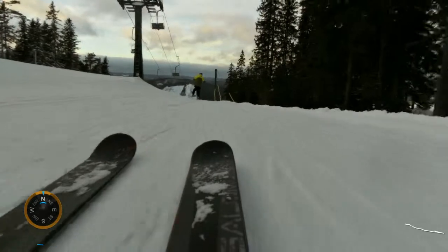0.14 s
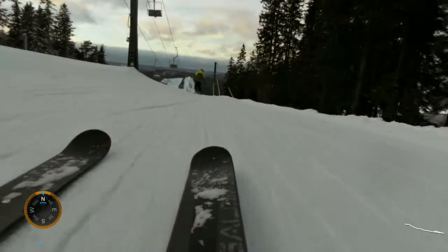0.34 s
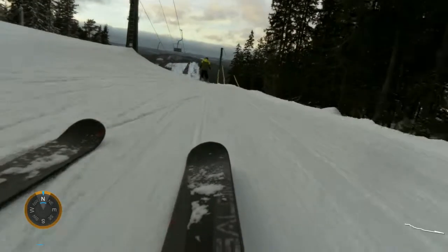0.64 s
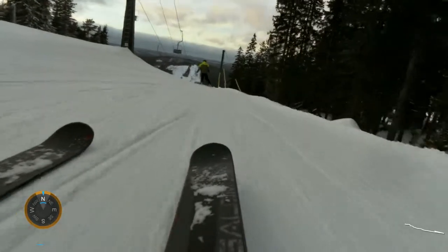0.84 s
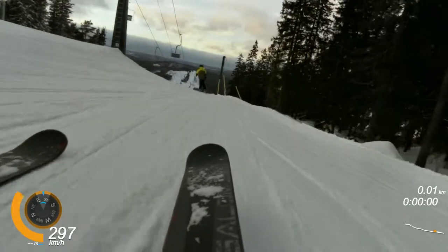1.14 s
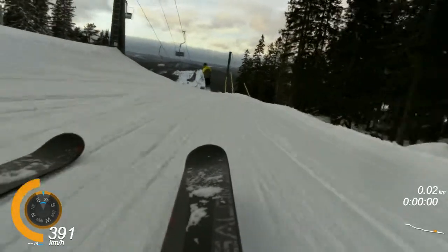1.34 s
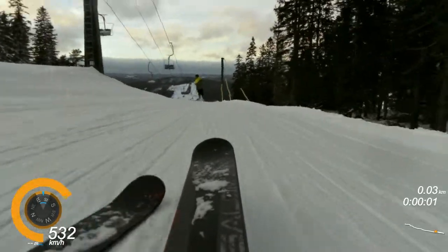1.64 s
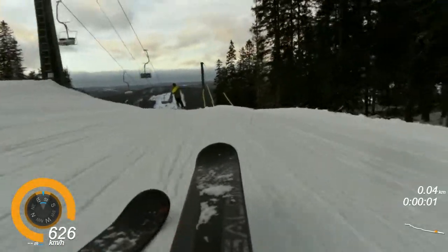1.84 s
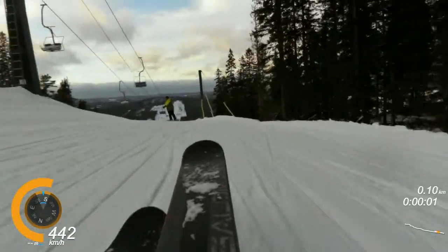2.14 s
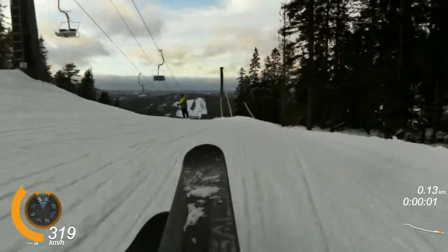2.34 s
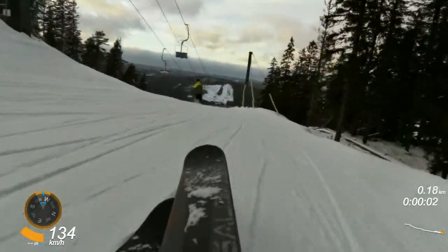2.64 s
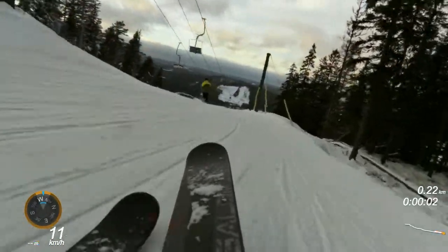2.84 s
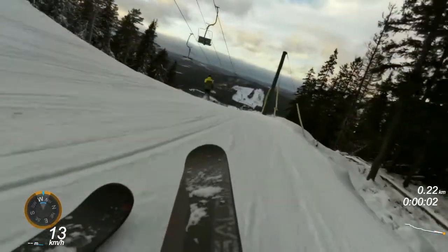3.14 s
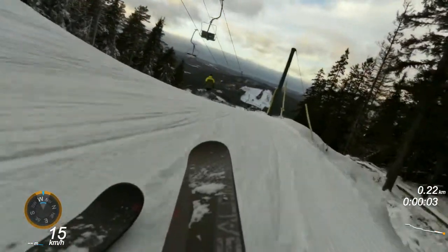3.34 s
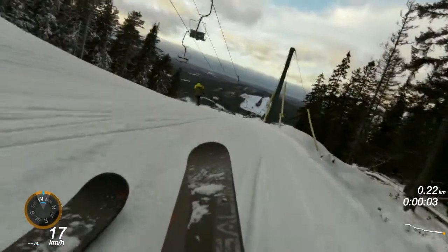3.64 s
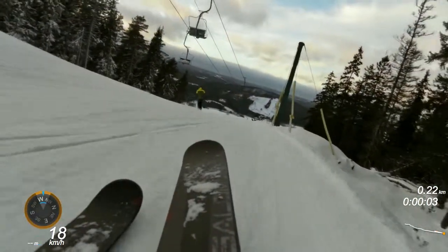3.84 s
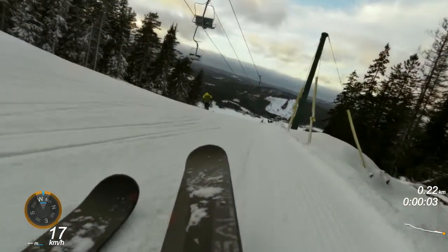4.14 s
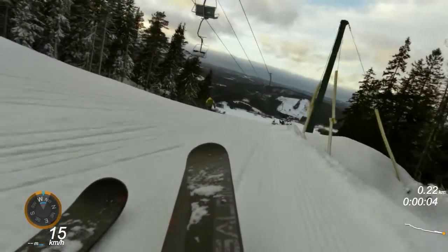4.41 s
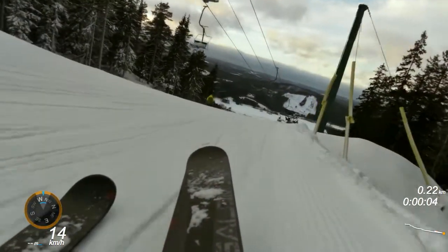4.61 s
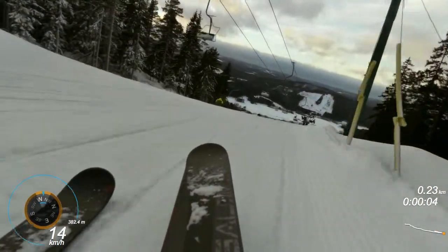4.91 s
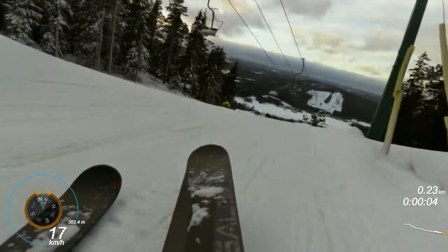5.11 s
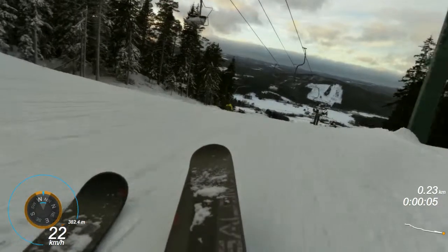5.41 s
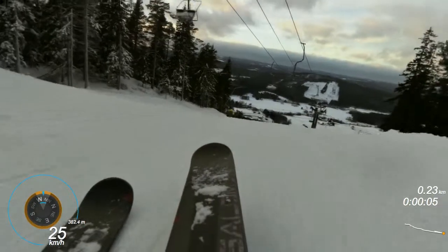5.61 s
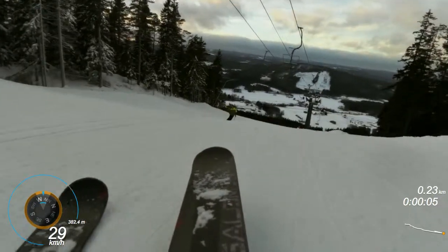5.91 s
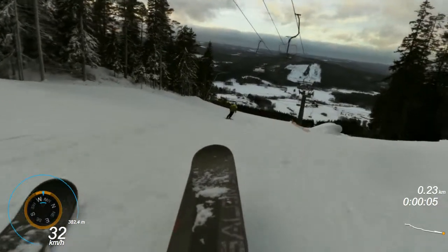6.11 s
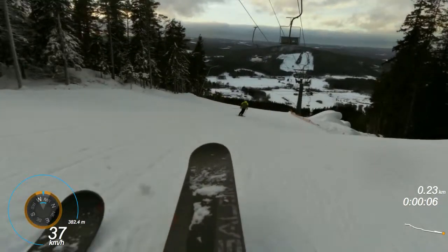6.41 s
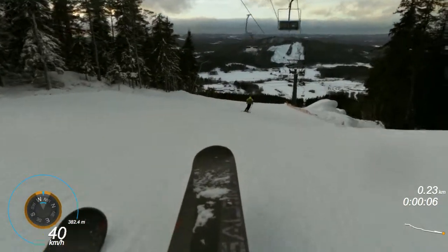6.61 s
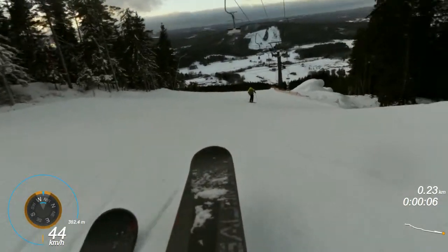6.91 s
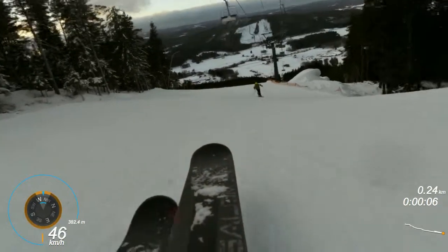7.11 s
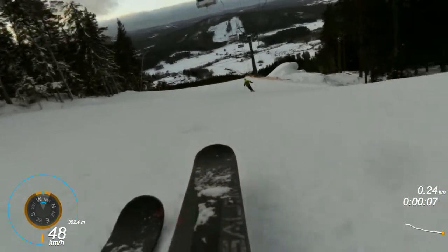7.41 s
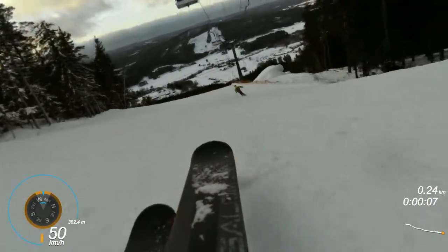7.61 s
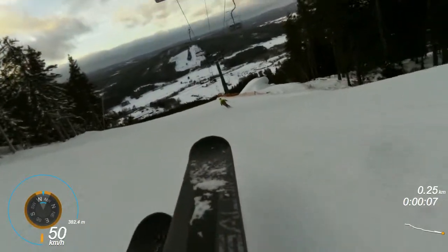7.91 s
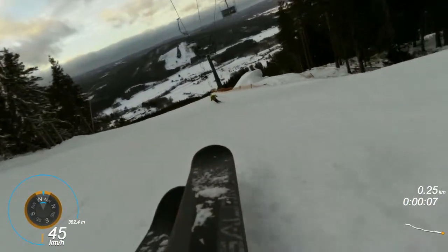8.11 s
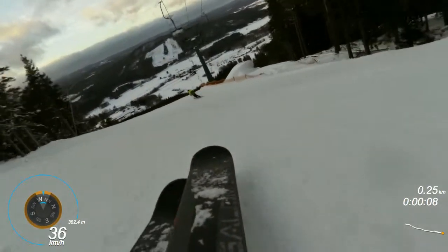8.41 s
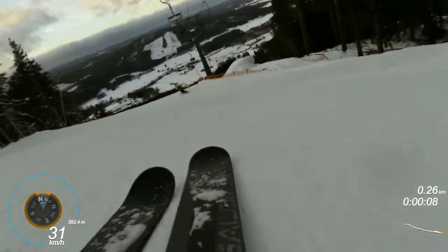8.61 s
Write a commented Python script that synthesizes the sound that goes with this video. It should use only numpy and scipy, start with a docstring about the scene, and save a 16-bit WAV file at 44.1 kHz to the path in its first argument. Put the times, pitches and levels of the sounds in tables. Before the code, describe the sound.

A ski runs over groomed snow, heard from a sealed camera mounted on it. It starts with rough jolts, rattling metal clacks and a deep hum, then settles into quieter chatter and muffled hiss. The mount knocks dully at uneven intervals and creaks faintly, and the binding clacks sharply now and then. Near the end come two loud, distorting bursts of thuds and clacks.

```python
"""A ski knocks, clacks and jolts over groomed snow, heard from a camera riding on it in a sealed housing.
Almost all the sound comes through the ski: the camera mount knocks and creaks, loose metal in the
binding clacks, and ruts give rough jolts. Underneath, the ski hums as it bends and chatters over small
bumps, while the hiss of the snow comes muffled through the housing. The loudest moments clip.
A "mode" below is one of the pitches at which a part naturally rings."""
import sys
import numpy as np
from scipy import signal
from scipy.fft import rfft, irfft, next_fast_len
from scipy.io import wavfile
from scipy.ndimage import map_coordinates

SR = 44100
rng = np.random.default_rng(int(sys.argv[2]) if len(sys.argv) > 2 else 0)


def generate_wav(sig):
    """Save sig (samples, or channels by samples) to the path in sys.argv[1] as 16-bit PCM at SR."""
    pcm = np.round(np.clip(np.atleast_2d(sig).T, -1, 1) * 32767).astype(np.int16)
    wavfile.write(sys.argv[1], SR, pcm)


N = 385875
TIME_S = np.arange(N) / SR


def amp(db):
    """Turn decibels into a gain."""
    return 10 ** (np.asarray(db) / 20)


def unit(x):
    """Scale x to an average (rms) level of 1."""
    return x / np.sqrt(np.mean(x ** 2) + 1e-20)


def along(points, hz):
    """Read between (pitch_hz, value) points on a log pitch scale."""
    pitches, values = np.transpose(points)
    return np.interp(np.log(hz + 1), np.log(pitches + 1), values)


def wobble(rate):
    """A smooth curve through rate random values a second."""
    return map_coordinates(rng.standard_normal(int(N * rate / SR) + 4), [np.arange(N) * rate / SR])


def filtered(x, response):
    """Filter x by response, a function of frequency."""
    size = next_fast_len(N + SR // 2)
    return irfft(rfft(x, size) * response(np.fft.rfftfreq(size, 1 / SR)), size)[:N]


def rush(spectrum, lumps_db, rate):
    """Uneven noise at level 1, shaped by (pitch_hz, relative_db) points, with rate lumps a second."""
    drive = rng.standard_normal(N) * amp(lumps_db * wobble(rate))
    return unit(filtered(drive, lambda hz: amp(along(spectrum, hz))))


def snow_hiss(level_db):
    """Snow hisses under the ski, muffled by the housing, with a faint steady hiss above it."""
    # the hiss inside the housing: pitch_hz, relative_db
    hiss_spectrum = [(820, -28), (1400, -6.5), (1600, -8), (1740, -4.5), (1940, -8), (2130, -5.5),
                     (2320, -6.5), (2630, -2), (2990, -8), (3230, -3), (3510, 1), (4060, -1.5), (4560, -8),
                     (5110, -5), (6430, -16.5), (8360, -33.5), (14100, -120)]
    # how the hiss's treble rises and falls: time_s, gain_db
    brightness = [(0, -5.5), (1.7, -4), (1.95, 0.5), (2.5, -0.5), (3.1, -1), (5.3, -1.5), (6.0, -2.5),
                  (7.6, 0.5), (8.75, -4)]
    # the faint high hiss: pitch_hz, relative_db
    high_spectrum = [(5000, -120), (7000, -2.5), (9000, -2), (12000, -12), (15000, -34.5)]
    hiss = rush(hiss_spectrum, lumps_db=1.5, rate=270)
    treble = filtered(hiss, lambda hz: hz > 4700)
    treble_gain = amp(np.interp(TIME_S, *np.transpose(brightness)))
    hiss = (hiss + (treble_gain - 1) * treble) * amp(level_db + 1.3 * wobble(22))
    return hiss + amp(-90.5) * rush(high_spectrum, lumps_db=0.5, rate=120)


def grit():
    """Icy grains scrape under the edge: brief puffs at the pitch where the housing rings most."""
    # scraping grains: time_s, level_db
    grains = [(3.391, -47.5), (5.4281, -48.5), (5.9075, -48.5)]
    puffs = sum(amp(db) * np.exp(-((TIME_S - s - .004) / 0.0098) ** 2) for s, db in grains)
    spectrum = [(1500, -120), (2600, -21), (3600, 5), (4400, 0.5), (6500, -36), (9000, -120)]
    return puffs * rush(spectrum, lumps_db=0.5, rate=340)


def rumble(chatter_db):
    """The whole ski rumbles, swelling and sinking further than the chatter does."""
    spectrum = [(30, -120), (58, -0.5), (90, -1.0), (130, -6), (500, -120)]
    return amp(-39.5 + 1.48 * (chatter_db + 31.5)) * rush(spectrum, lumps_db=5.5, rate=26)


def swing_db(chatter_db):
    """How strongly the ski bends to and fro: a bump raises the swing, it holds, then dies away."""
    # bumps that set the ski swinging: start_s, level_db, fade_db_per_s
    bumps = [(0.0, -25, 35), (0.33, -32, 68), (0.56, -21, 52.5), (1.8, -47, 120), (2.05, -46, 198),
             (2.76, -46.5, 205), (2.95, -40.5, 64), (3.38, -45.5, 57), (3.7, -45.5, 63), (3.98, -48, 200),
             (5.12, -41, 199), (5.35, -44, 200), (5.56, -50, 78), (6.8, -45, 298), (7.74, -40, 63.5),
             (8.04, -29, 102.5), (8.16, -36, 80), (8.65, -20.5, 56)]
    rise_s, hold_s = 0.046, .05
    power = amp(chatter_db - 14 + 5.5 * wobble(7.8)) ** 2  # between bumps it follows the chatter
    for s, db, fade_db_per_s in bumps:
        rise = np.clip((TIME_S - s) / rise_s, 0, 1)
        fade_db = fade_db_per_s * np.maximum(TIME_S - s - rise_s - hold_s, 0)
        power += (rise * amp(db - fade_db)) ** 2
    return 10 * np.log10(power)


def hum(level_db):
    """The ski hums as it bends; wide swings stiffen it and add overtones."""
    # the ski's slowest bending mode: pitch_hz, wander_hz
    bending = (44, 2.6)
    pitch_hz, wander_hz = bending
    phase = 2 * np.pi * np.cumsum(pitch_hz + wander_hz * wobble(9)) / SR
    swing = np.sqrt(2) * amp(level_db + 1.7 * wobble(13))
    overtones = np.sin(2 * phase) + 0.6 * np.sin(3 * phase)
    return swing * (np.sin(phase) + np.sqrt(swing) * overtones)


def chatter(rate, spread_db):
    """Small bumps of mixed sizes, about rate a second, kick the mount's low modes."""
    # the low modes: pitch_hz, width_hz, relative_db
    modes = [(77.6, 26, -9), (116, 63, -8), (177, 36.4, -1), (261, 41, -2), (335, 73, -11), (530, 67, -27)]

    def response(f):
        """The modes ring, and snow cushions each kick."""
        ring = sum((-1) ** k * amp(db) * 1j * f * width / (hz * hz - f * f + 1j * f * width)
                   for k, (hz, width, db) in enumerate(modes))
        return ring / (1 + 1j * f / 420) ** 3

    kicks = rng.random(N) < rate / SR
    sizes = amp(spread_db * np.minimum(rng.exponential(size=N), 3.5))
    ringing = filtered(kicks * sizes * rng.choice([-1, 1], N), response)
    slide = np.cumsum(1 + .1 * wobble(12))  # changing load slides the pitches up and down
    return unit(np.interp(slide * N / slide[-1], np.arange(N), ringing))


def glide():
    """Running over snow, the ski chatters, scrapes, hums, rumbles and hisses."""
    # levels along the run: time_s, chatter_db, scrape_db, hiss_db
    run_levels = [(0.0, -22, -31.5, -65.5), (0.27, -37, -74, -69.5), (0.36, -45, -54.5, -62),
                  (0.54, -39.5, -53, -60.5), (0.63, -31, -51.5, -64.5), (0.92, -48, -56.5, -61.5),
                  (1.2, -50, -57.5, -60.5), (1.7, -45.5, -54, -62.5), (2.12, -38, -49.5, -60.5),
                  (2.28, -48, -57, -64.5), (2.52, -42, -58.5, -62.5), (2.75, -44.5, -58, -60.5),
                  (3.04, -41, -57, -53), (3.36, -50.5, -59, -53), (3.75, -47.5, -59, -56),
                  (4.4, -46, -60.5, -57), (4.82, -50.5, -61, -56), (5.15, -48.5, -59, -53),
                  (5.42, -44.5, -58.5, -52), (5.85, -43.5, -51.5, -56), (6.53, -38.5, -49.5, -59.5),
                  (7.04, -37, -44, -56), (7.93, -33, -38, -50.5), (8.06, -29.5, -42.5, -56.5),
                  (8.21, -27.5, -37.5, -46.5), (8.33, -41, -41.5, -48), (8.75, -30, -41, -53)]
    # the ski scraping on snow: pitch_hz, relative_db
    scrape_spectrum = [(210, -12), (350, -3.5), (573, -5), (628, -6), (1080, -11.5), (1330, -15),
                       (1630, -23), (2200, -32.5), (2860, -62), (4840, -120)]
    times, *levels = np.transpose(run_levels)
    chatter_db, scrape_db, hiss_db = (np.interp(TIME_S, times, db) for db in levels)
    bumps = wobble(14)  # small bumps shake chatter and scrape together
    shake = amp(chatter_db + 2.42 * bumps) * chatter(rate=350, spread_db=4.0)
    scrape = amp(scrape_db + 1.4 * bumps) * rush(scrape_spectrum, lumps_db=1.5, rate=400)
    return shake + scrape + hum(swing_db(chatter_db)) + rumble(chatter_db) + snow_hiss(hiss_db)


def creaks_and_thuds():
    """Short, uneven sliding tones: creaks of the mount and deep thuds of hard jolts."""
    # creaks and thuds: start_s, length_s, start_hz, end_hz, level_db
    sliding_tones = [(2.064, 0.068, 262, 316, -27.5), (2.219, 0.029, 534, 710, -40.5),
                     (2.492, 0.037, 250, 321, -29), (2.518, 0.059, 295, 195, -26),
                     (2.986, 0.044, 313, 370, -40), (4.107, 0.06, 265, 284, -37.5),
                     (4.64, 0.053, 390, 258, -39.5), (4.911, 0.046, 250, 296, -41),
                     (7.453, 0.035, 273, 321, -24), (7.574, 0.036, 293, 303, -26),
                     (7.9647, 0.013, 334, 305, 1.5), (7.98, 0.031, 207.4, 104.3, -5.5),
                     (7.992, 0.064, 57.6, 79, -13), (8.012, 0.012, 282, 237, -2),
                     (8.146, 0.0046, 334, 300, -2.5), (8.633, 0.03, 190, 130, -16),
                     (8.679, 0.02, 95, 80, -9), (8.724, 0.02, 149, 191, -2)]
    out, pace = np.zeros(N), 1 + .09 * wobble(110)
    for s, length_s, start_hz, end_hz, db in sliding_tones:
        progress = np.linspace(0, 1, round(length_s * SR))
        span = slice(round(s * SR), round(s * SR) + len(progress))
        pitch_hz = (start_hz + (end_hz - start_hz) * progress) * pace[span]
        phase = 2 * np.pi * np.cumsum(pitch_hz) / SR
        out[span] += amp(db) * np.sin(np.pi * progress) * (np.sin(phase) + 0.096 * np.sin(2 * phase))
    return out * amp(3 * np.tanh(wobble(60)))


def jolts():
    """A rut shakes the low and middle modes in a short rough burst; loose parts crackle on top."""
    # the ski grinding over ruts: start_s, length_s, low_db, middle_db
    ruts = [(0, 0.091, -19.5, -33.5), (0.092, 0.17, -19, -30.5), (0.249, 0.06, -25, -35.5),
            (0.52, 0.1, -19, -31), (2.163, 0.058, -34, -44), (7.94, 0.025, -16, -22.5),
            (7.973, 0.053, -9, -18.5), (8.014, .07, -28, -49.5), (8.22, 0.13, -33, -37.5),
            (8.627, 0.079, -15.5, -28), (8.716, 0.032, -12, -27)]
    low_gain, middle_gain = np.zeros((2, N))
    for s, length_s, low_db, middle_db in ruts:
        burst = np.clip((TIME_S - s) / 0.012, 0, 1) * np.clip((s + length_s - TIME_S) / 0.011, 0, 1)
        low_gain += amp(low_db) * burst
        middle_gain += amp(middle_db) * burst
    low = rush([(35, -50), (60, -2.5), (95, 2.5), (130, -2), (190, 1.5), (270, 4), (340, -3.5),
                (450, -7), (900, -54), (3000, -120)], lumps_db=5, rate=63)
    middle = rush([(250, -36.5), (480, 5), (900, -4), (1300, -19.5), (2000, -36), (4000, -120)],
                  lumps_db=4, rate=160)
    crackle = rush([(700, -120), (1400, -2), (2000, -1), (3000, -3.5), (4500, -19), (6500, -36.5),
                    (10000, -120)], lumps_db=6.5, rate=260)
    return low_gain * low + middle_gain * (middle + amp(-27) * crackle)


def struck(modes, times, mode_db, contact_s, scatter_db, detune, damping):
    """Blows ring the modes, one row of mode_db a blow; the ring falls 60 dB in ring_s / damping."""
    out, t = np.zeros(N + SR), np.arange(SR // 5) / SR
    hz, level_db, ring_s = np.transpose(modes)[..., None]
    sign = (-1) ** np.arange(len(modes))[:, None]  # neighbouring modes push the camera opposite ways
    rise = sign * (1 - np.exp(-(t / contact_s) ** 2))
    chances = rng.standard_normal((*mode_db.shape, 2))
    for s, db, chance, faster in zip(times, mode_db, chances, damping):
        envelope = rise * amp(level_db - 60 * faster * t / ring_s)
        tune = 1 + detune * chance[:, 1:]  # the load on the ski shifts the modes a little
        tones = envelope * np.sin(2 * np.pi * hz * tune * t)
        out[round(s * SR):][:len(t)] += amp(db + scatter_db * chance[:, 0]) @ tones
    # The blows carry little deep bass.
    return filtered(out[:N], lambda f: (1j * f / (70 + 1j * f)) ** 2)


def clacks():
    """Loose metal in the binding clacks sharply."""
    # hard hits: start_s, level_db, low_gain_db, high_gain_db
    contacts = [(0.015, -19.5, -10.5, -15), (0.079, -30, -4, -23), (0.142, -13, -8, -18.5),
                (0.156, -36, -10, -5), (0.183, -30, -8.5, -18), (0.242, -37, -4.5, -6),
                (0.265, -10, -9, -16.5), (0.269, -23, -7, -16), (0.289, -11.5, -11, -20.5),
                (0.378, -36, -13, -11), (0.439, -30, -6, -8.5), (0.669, -12, -2, -9.5), (1.975, 0, -7, -9),
                (2.006, -3, -6, -12), (2.298, -21.5, -1.5, -16), (2.688, -31, 3.5, -32),
                (5.308, -34, -13, -14), (7.489, -1, -6.5, -8.5), (7.522, -1, -10, -13),
                (7.966, -5, -0.5, -10), (7.981, -9, -15.5, -18.5), (7.988, -14, -5, -3),
                (7.993, -20, -5, -14), (8.002, -12.5, -2, -9), (8.021, -23, 4.5, -10),
                (8.032, -26.5, 11, -8), (8.099, -26.5, -10, -13), (8.124, -18, -4, -13),
                (8.146, -11.5, -18, -18), (8.645, -29, -3, -10), (8.66, -3.5, -22, -10),
                (8.663, -7.5, -16, -6), (8.665, -20, 0, -1), (8.671, -26, -5, -3), (8.675, -8, -18, -12),
                (8.693, -15.5, -2, -26), (8.714, -12, -9, -10), (8.72, -10.5, -4, -12),
                (8.728, -12, -4, -8), (8.7355, -18, -5, -9)]
    # the binding's modes: pitch_hz, level_db, ring_s
    modes = [(210.7, -0.5, 0.076), (289, -10.5, 0.11), (385.6, -5.5, 0.049), (465, -12.5, 0.053),
             (571, -10, 0.03), (805, -4.5, 0.026), (1056, -3.5, 0.014), (1326, -8.5, 0.018),
             (1884, 1, 0.012), (2710, -5, 0.009), (3190, -6, 0.0082), (4360, -15.5, 0.0065),
             (5360, -27, 0.006), (9500, -41.5, 0.003)]
    s, db, low_db, high_db = np.transpose(contacts)[..., None]
    hz = np.transpose(modes)[0]
    mode_db = db + (hz < 450) * low_db + (hz > 1500) * high_db
    hits = struck(modes, s[:, 0] + .0015, mode_db, contact_s=0.00019, scatter_db=2.5,
                  detune=0.033, damping=np.ones(len(s)))
    lead = round(.0022 * SR)  # a faint copy 2.2 ms early softens each attack
    return hits + amp(-23) * np.pad(hits[lead:], (0, lead))


def knocks():
    """The mount knocks dully; firmer blows reach its middle modes, and the ski shudders briefly."""
    # dull knocks: start_s, level_db, middle_gain_db
    contacts = [(0.107, -8.5, -16.5), (0.535, -6, -16), (0.84, -26, -37), (1.469, -26.5, -15),
                (1.541, -15.5, -28), (1.82, -14, -50), (2.198, -29, -9), (2.455, -8, -49.5),
                (2.876, -8.5, -7.5), (3.052, -12.5, -8.5), (3.382, -18, -50), (3.596, -9.5, -8),
                (3.724, -22, -20.5), (3.753, -24, -23), (3.915, -24, -17.5), (3.96, -20, -41),
                (4.007, -14.5, -9.5), (4.458, -10, -6), (4.605, -14, -45), (5.026, -22.5, -32),
                (5.095, -10, -6), (5.331, -9.5, -6), (5.618, -20, -46), (5.715, -14.5, -35),
                (6.071, -22.5, -29), (6.475, -10.5, -7.5), (6.579, -15.5, -16.5), (6.762, -18, -11),
                (6.851, -13.5, -22), (6.903, -10, -9), (7.101, -14, -35), (7.128, -15, -21.5),
                (7.294, -8.5, -6), (7.647, -6, -9), (7.812, -9, -11.5), (8.145, -14, -6),
                (8.54, -12.5, -22)]
    # modes of the ski and mount: pitch_hz, level_db, ring_s
    modes = [(184.1, -6.5, 0.13), (287.7, -7.5, 0.074), (341.2, -5.5, 0.078), (497, 0, 0.041),
             (598, -12, 0.081), (753, -0.5, 0.03), (930, -11.5, 0.029), (1240, -17, .028),
             (1424, -23.5, 0.021), (1690, -22.5, 0.021)]
    s, db, middle_db = np.transpose(contacts)[..., None]
    hz = np.transpose(modes)[0]
    middle_share = np.clip((hz - 200) / 280, 0, 1) ** 2
    damping = 1 + np.clip(-middle_db[:, 0] - 12.5, 0, None) / 20  # a soft contact stays on and damps
    blows = struck(modes, s[:, 0] + 0.002973, db + middle_share * middle_db, contact_s=0.00086,
                   scatter_db=1.9, detune=0.022, damping=damping)
    # The shudder follows each blow's strength and dies away.
    tail = signal.lfilter([1 / (0.039 * SR)], [1, 1 / (0.028 * SR) - 1], np.abs(blows))
    shudder = rush([(90, -59), (190, 2), (400, -7), (850, -22.5), (1500, -39), (3000, -120)],
                   lumps_db=-0.5, rate=140)
    return blows + amp(-8.5) * tail * shudder


def scene():
    """All sources at one microphone, over a very faint even hiss."""
    ski = glide() + knocks() + clacks() + creaks_and_thuds() + grit() + jolts()
    return (ski + amp(-100) * rng.standard_normal(N))[None]


def record(dry):
    """The loudest peaks clip, the deepest bass and highest treble are cut, and the end fades out."""
    clip_level, top_hz, slope_hz, bass_hz, fade_s = .715, 16100, 700, 4, .009
    clipped = np.clip(dry[0], -clip_level, clip_level)
    treble_cut = lambda hz: np.sin(np.pi / 2 * np.clip((top_hz - hz) / slope_hz, 0, 1)) ** 2
    bass_cut = lambda hz: 1j * hz / (bass_hz + 1j * hz)
    fade = np.clip(TIME_S[::-1] / fade_s, 0, 1)
    return filtered(clipped, lambda hz: treble_cut(hz) * bass_cut(hz))[None] * fade


dry = scene()
out = record(dry)
generate_wav(out)
```